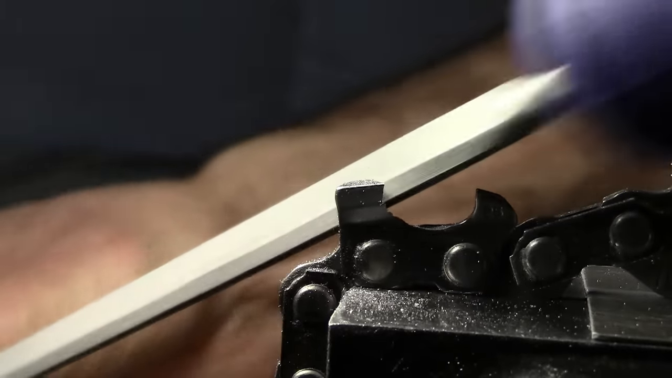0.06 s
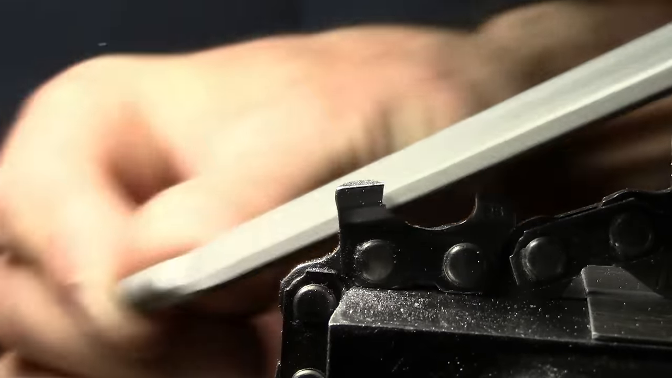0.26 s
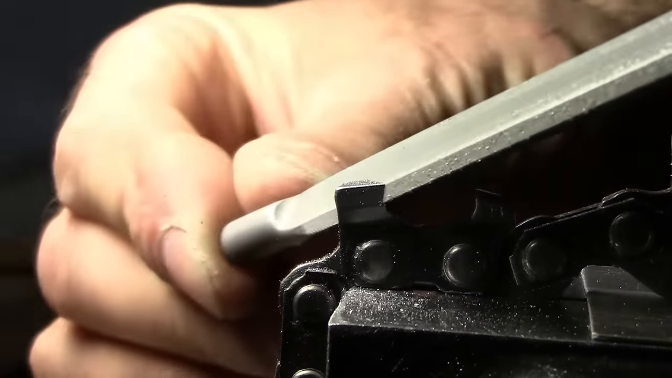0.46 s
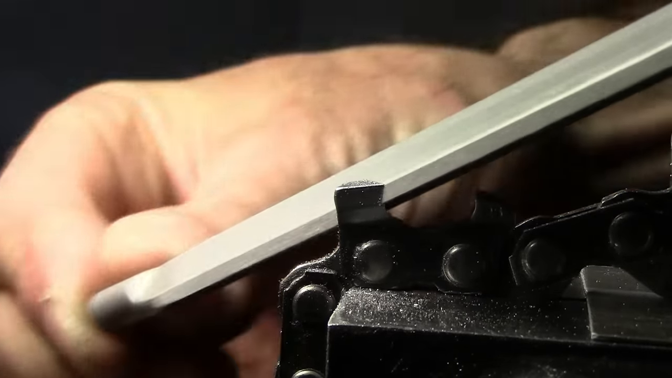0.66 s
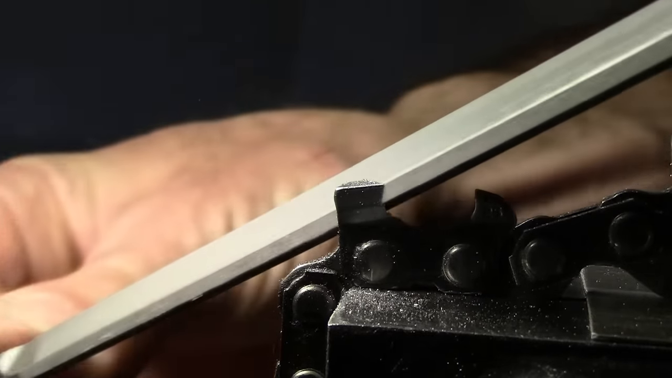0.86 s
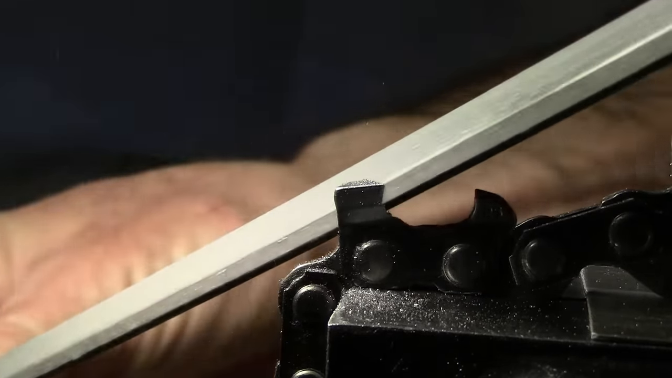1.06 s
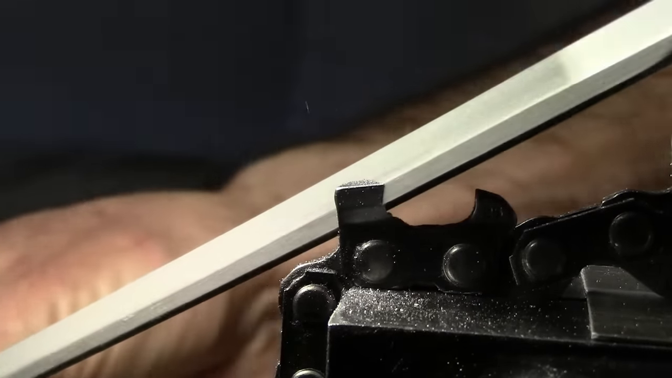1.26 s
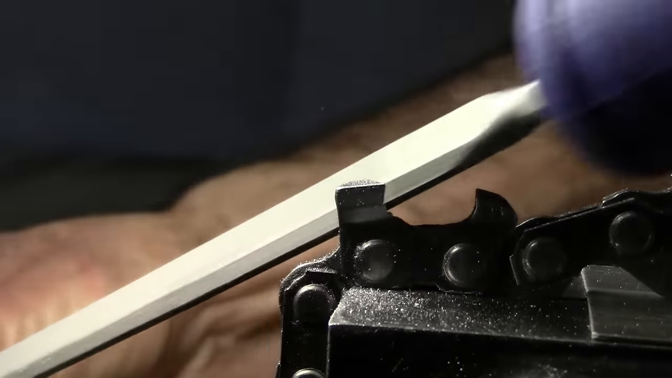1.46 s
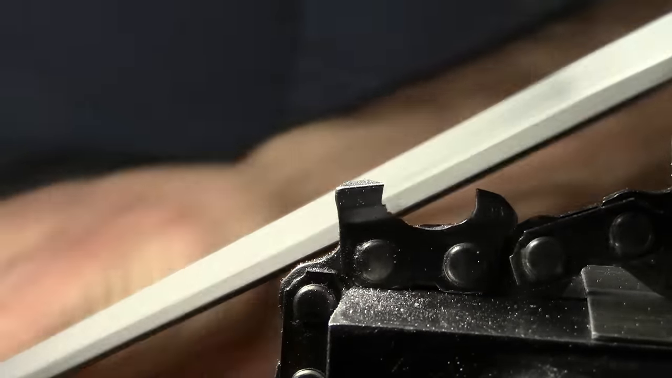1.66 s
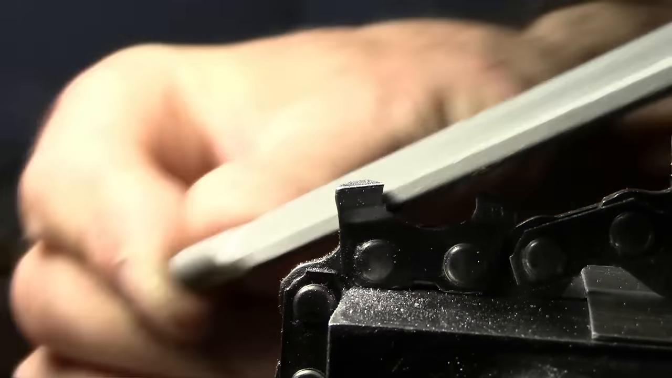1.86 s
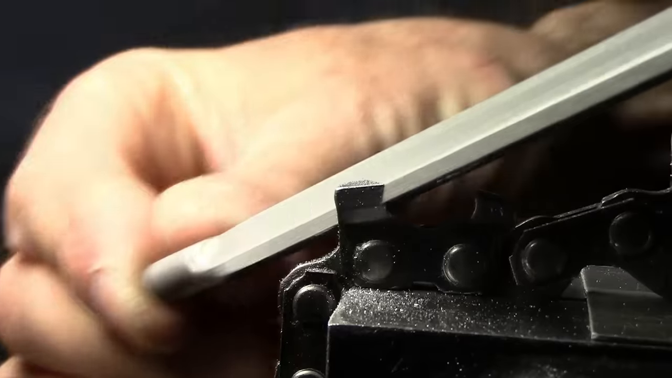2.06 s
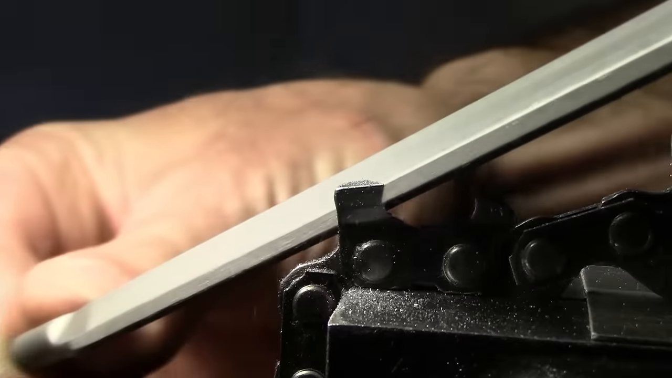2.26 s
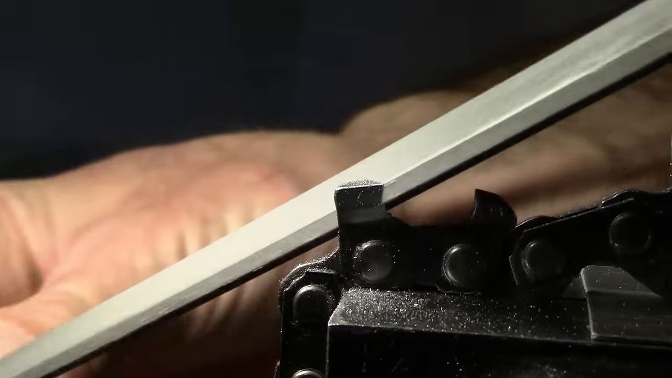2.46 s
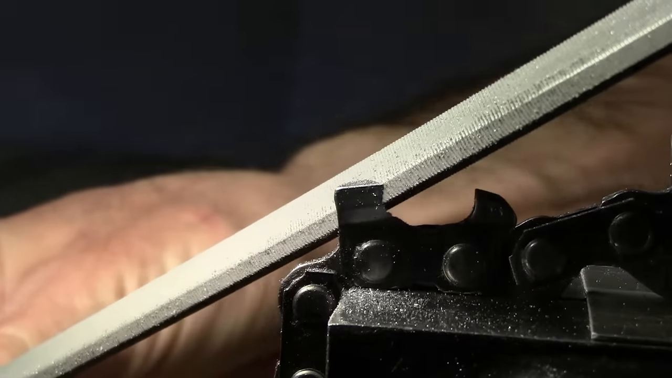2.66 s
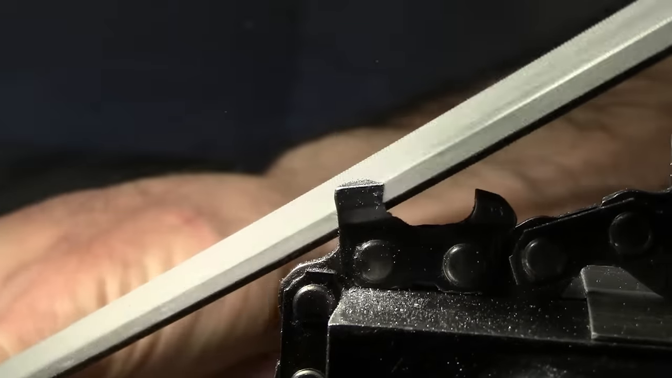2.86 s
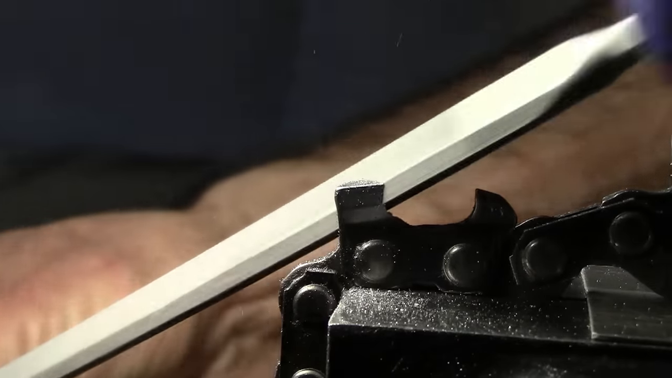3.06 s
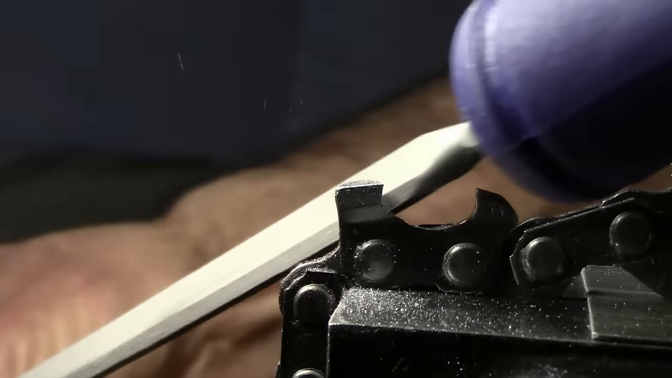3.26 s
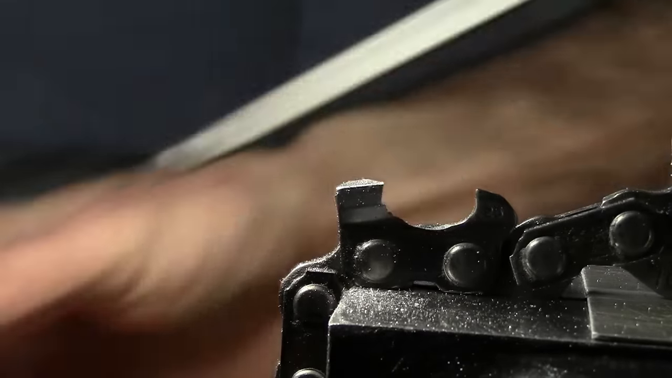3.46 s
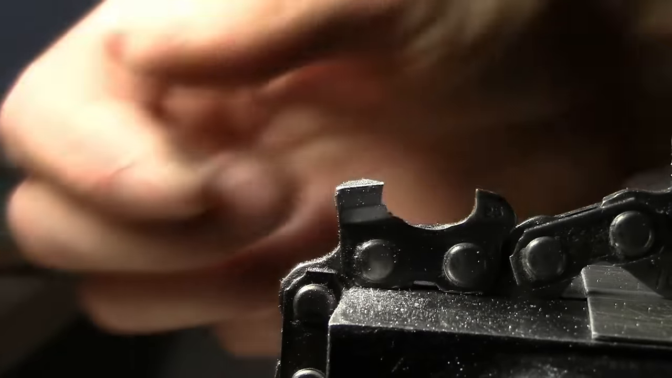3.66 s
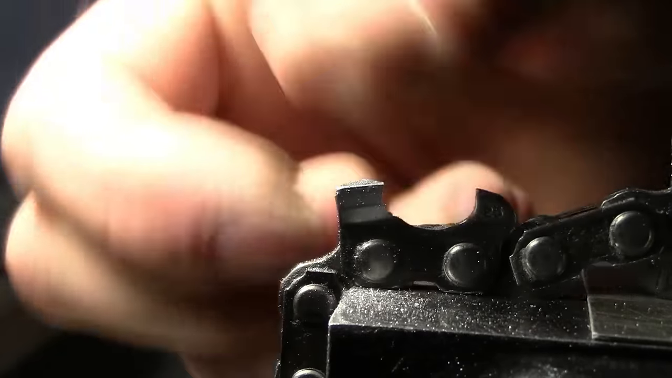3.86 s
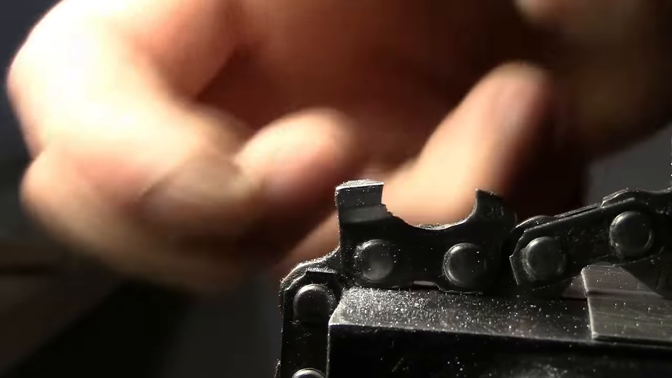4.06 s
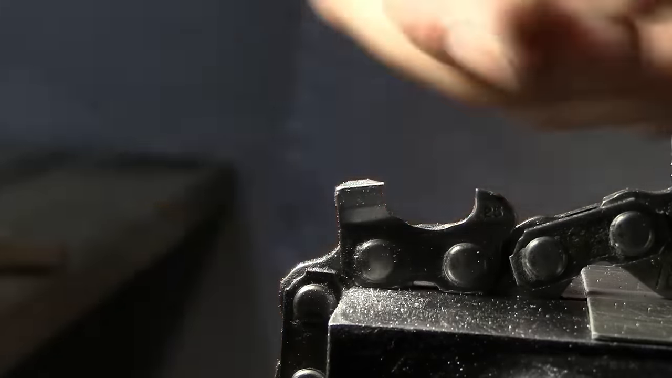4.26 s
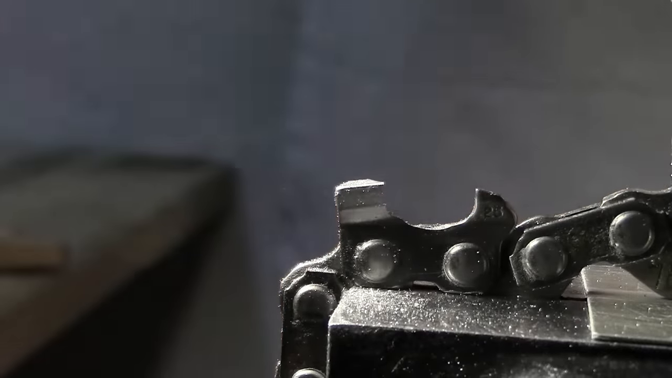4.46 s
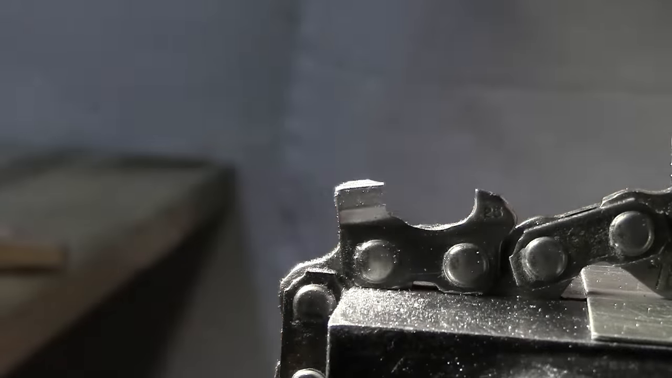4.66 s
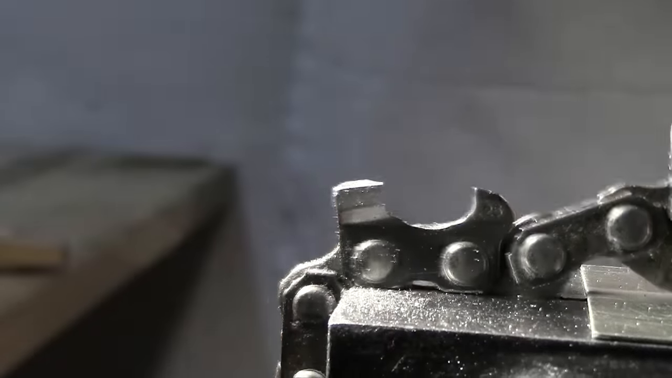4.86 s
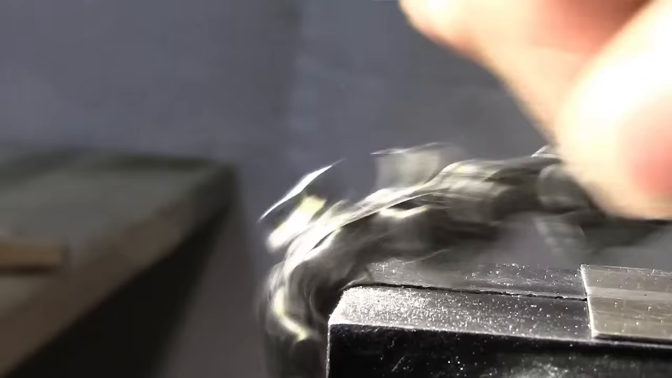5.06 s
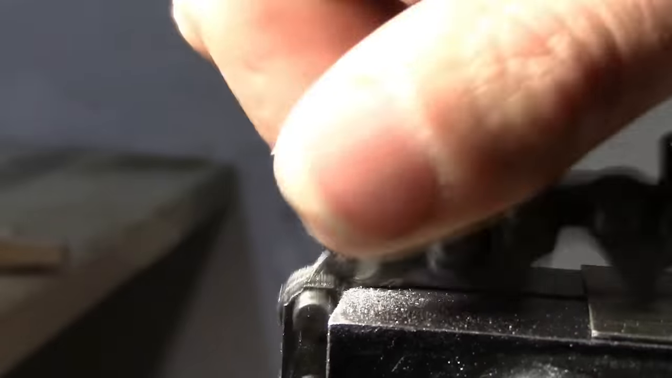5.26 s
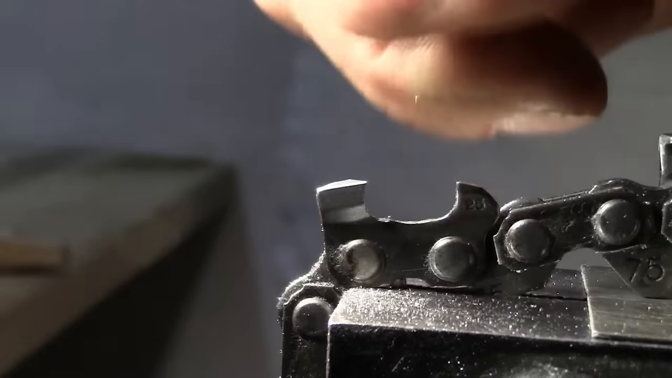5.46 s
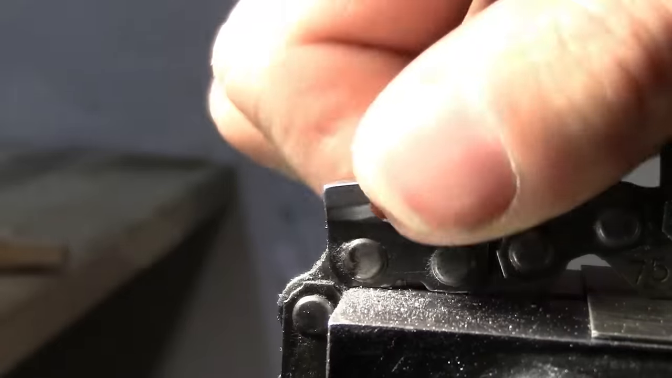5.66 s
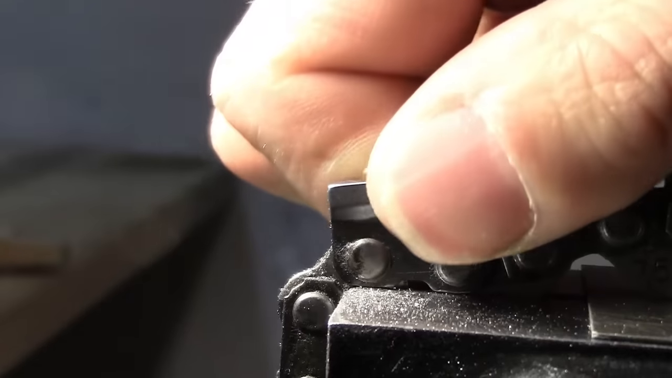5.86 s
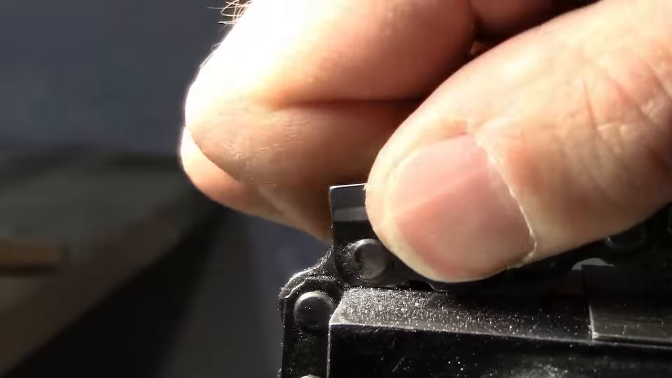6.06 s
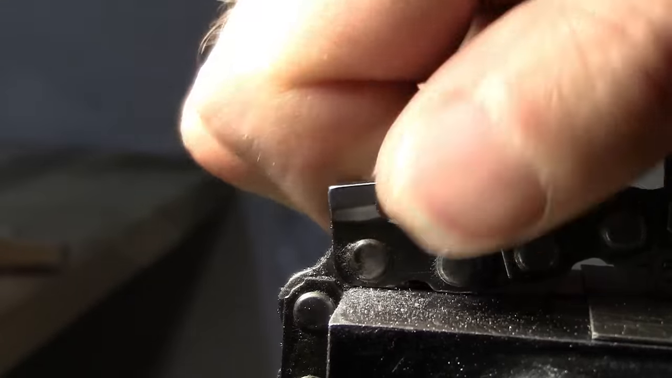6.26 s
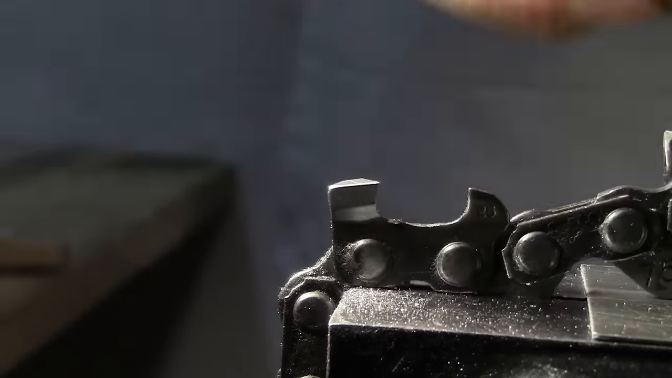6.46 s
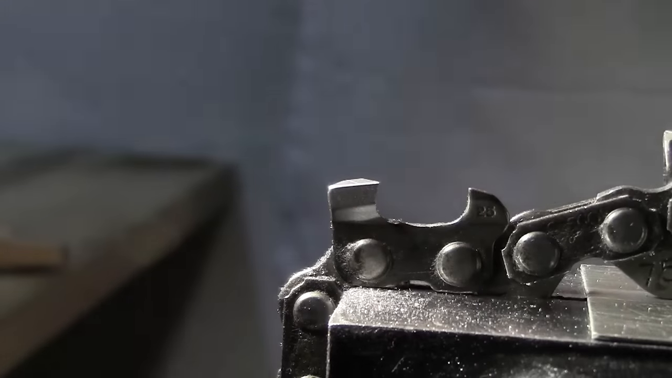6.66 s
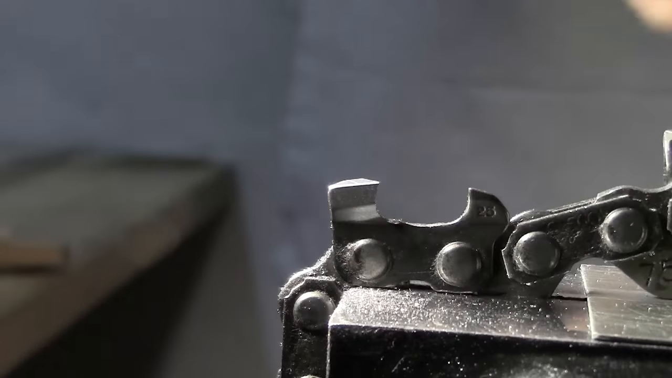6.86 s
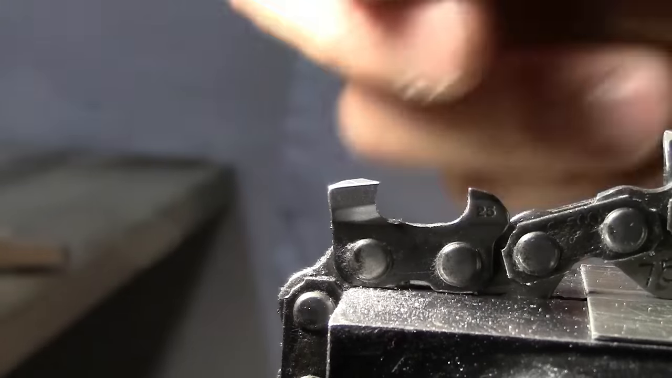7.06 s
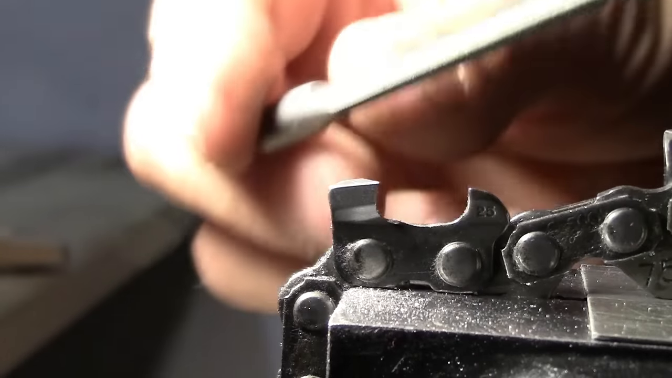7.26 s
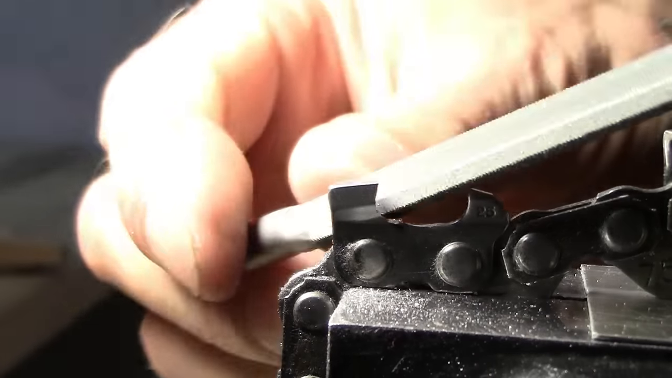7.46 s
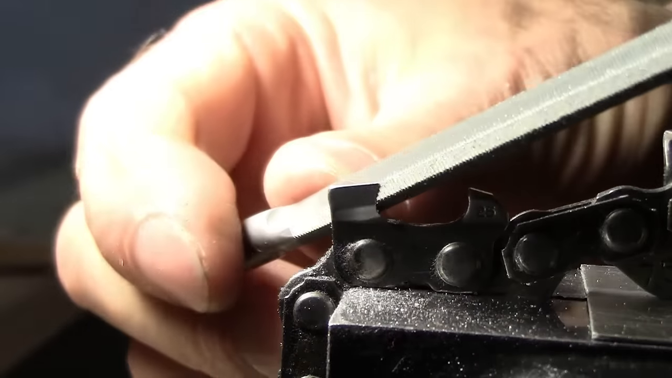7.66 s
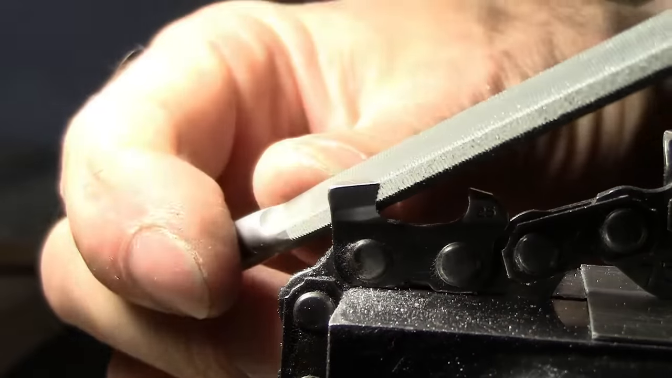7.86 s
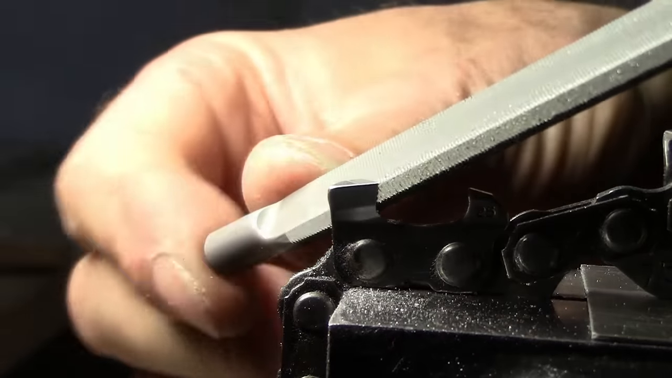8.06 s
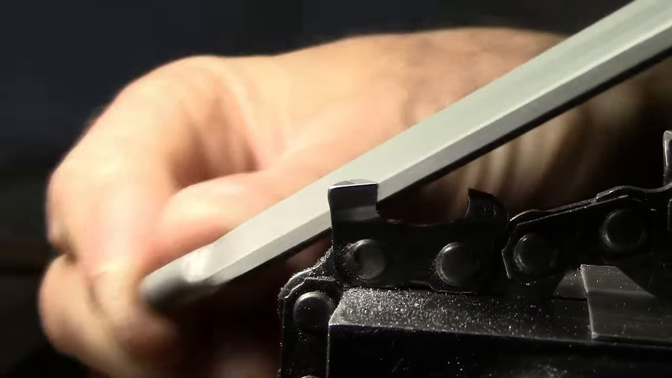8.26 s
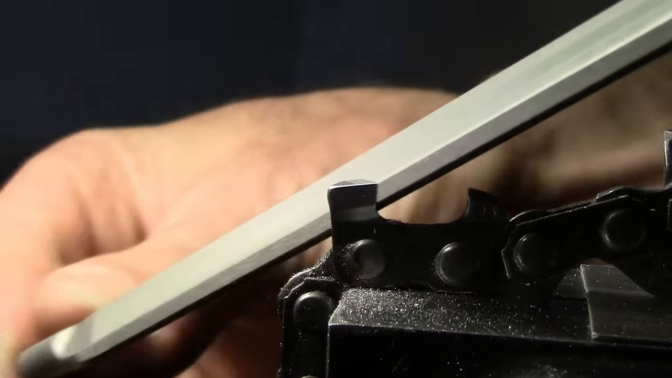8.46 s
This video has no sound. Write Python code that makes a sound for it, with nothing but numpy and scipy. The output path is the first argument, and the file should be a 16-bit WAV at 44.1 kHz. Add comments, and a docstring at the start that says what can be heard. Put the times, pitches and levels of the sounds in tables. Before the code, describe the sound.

Harsh bright scraping of a file on clamped steel, each stroke about a second long, its pitch rising with hand speed and the bench humming low beneath. Then a clanging drop, a low jolt, a quick rattling drag of chain, a squeaky turn of the vice screw ending in a clunk, a quiet pause, light ticks and a fresh rasp. Close microphone, short room reverberation, faint low air noise.

```python
"""Sharpening a saw chain in a vice

A hand file is pushed across a saw-chain cutter held in a bench vice. The file is set down ringing,
the vice is opened, the chain is dragged on link by link, the vice is screwed shut and filing starts again.
Friction is flickering noise and blows are scattered clicks; both excite resonances of steel and bench.
The dropped file is a sum of decaying modes. A small workshop reverberates around it, over steady air noise.
"""
import sys
import numpy as np
from scipy import signal
from scipy.fft import rfft, irfft
from scipy.io import wavfile

SR = 44100
rng = np.random.default_rng(int(sys.argv[2]) if len(sys.argv) > 2 else 0)


def to_wav(s):
    """Save 16-bit WAV."""
    ch = np.atleast_2d(s).T  # columns
    pcm = np.round(np.clip(ch, -1, 1) * 32767)  # PCM
    wavfile.write(sys.argv[1], SR, pcm.astype(np.int16))


N = 375732


def from_db(db):
    """Level: decibels become an amplitude ratio."""
    return 10 ** (np.asarray(db) / 20)


def unit(x):
    """Normalisation: the signal is scaled to energy 1."""
    return x / np.sqrt(np.sum(x ** 2) + 1e-20)


def filtered(x, order, hz, kind="low"):
    """Spectral shaping: a Butterworth filter passes one range of frequencies."""
    return signal.sosfilt(signal.butter(order, hz, kind, fs=SR, output="sos"), x)


def in_time(tables, before):
    """Control curves: columns interpolated at every sample; outside the tables they hold `before`."""
    out = np.tile(np.array(before, float)[:, None], N)
    for rows in tables:
        s, *columns = np.transpose(rows)
        at = np.arange(round(s[0] * SR), min(round(s[-1] * SR), N))
        out[:, at] = [np.interp(at / SR, s, c) for c in columns]
    return out


def drift(rate):
    """Slow random modulation: chance values of spread about 1, `rate` per second, joined by lines."""
    knots = rng.standard_normal(int(200 * N / SR) + 2)
    return np.interp(np.arange(N) * rate / SR, np.arange(len(knots)), knots) * np.sqrt(3 / 2)


def lagged(gain, lag_s):
    """Inertia: a heavy body follows a force slowly, as a first-order lag."""
    r = np.exp(-1 / (max(lag_s, .001) * SR))
    return signal.lfilter([1 - r], [1, -r], gain, zi=[r * gain[0]])[0]


def gliding(hz, half_width_hz):
    """Quadrature modulation: low-passed noise on a moving carrier is a gliding narrow band; rms 1."""
    slow = filtered(rng.standard_normal((2, N)), 2, half_width_hz)
    phase = 2 * np.pi * np.cumsum(hz) / SR
    return unit(slow[0] * np.cos(phase) + slow[1] * np.sin(phase)) * np.sqrt(N)


def response(peaks):
    """Modal superposition: impulse response of parallel resonances; white noise comes out at rms 1."""
    click, out = signal.unit_impulse(SR // 3), 0
    for k, (hz, width, db) in enumerate(sorted(peaks)):
        r = np.exp(-np.pi * width / SR)
        poles = [1, -2 * r * np.cos(2 * np.pi * hz / SR), r * r]
        mode = signal.lfilter([(1 - r * r) / 2, 0, -(1 - r * r) / 2], poles, click)
        out = out + (-1) ** k * from_db(db) * mode   # neighbouring modes have opposite signs
    return unit(out)


def through(force, peaks):
    """Linear response: a force sounds through a body by convolution."""
    return signal.oaconvolve(force, response(peaks))[:N]


def steel(middle, high, peaks, wander_db=0):
    """Modal coupling: lower and upper modes have a drive each; coupling varies as the contact moves."""
    split_hz, out = 3500, 0
    lower = [p for p in peaks if p[0] < split_hz]
    upper = [p for p in peaks if p[0] >= split_hz]

    def power(group):
        return sum(width * from_db(2 * db) for _, width, db in group)

    for drive, group in ((middle, lower), (high, upper)):
        for third in range(3):   # every third mode shares one wandering coupling
            part = group[third::3]
            share = np.sqrt(power(part) / power(group))
            out = out + share * through(drive * from_db(wander_db * drift(7.8)), part)
    return out


# Resonances of the bench top: (frequency [Hz], width [Hz], relative level [dB])
BENCH_MODES = [(125, 14, -13), (160, 18, -8), (190, 14, -5), (214, 11, 1), (240, 18, -6), (200, 200, -26)]


def bench(force):
    """Structure-borne sound: a force on the steel is passed on to the bench top."""
    return through(force, BENCH_MODES)


def grit(spread_db, flutter_db):
    """Asperity contact: dense micro-impacts of uneven size whose strength flutters; rms 1."""
    sizes_db = spread_db * np.minimum(rng.exponential(1, N), 5)
    sizes = from_db(sizes_db + flutter_db * drift(45.0))
    return unit(sizes * rng.standard_normal(N)) * np.sqrt(N)


def rub(rasp_db, hiss_db, bench_db, bench_lag_s, peaks, spread_db, high_spread_db, flutter_db,
        wander_db, bites=0):
    """Friction excitation: rough contact drives the steel, and through it the slower bench."""
    force = grit(spread_db, flutter_db)
    bench_sound = bench(lagged(from_db(rasp_db + bench_db), bench_lag_s) * force)
    middle = from_db(rasp_db) * (force + bites)
    high = from_db(rasp_db + hiss_db) * grit(high_spread_db, flutter_db)
    return bench_sound + steel(middle, high, peaks, wander_db)


def skids(rows):
    """Transient contact: it closes fast, sags and lets go; gives rasp, hiss and bench levels."""
    contact_s, let_go_s, let_go_db = 0.0027, 0.065, 39.96
    curves = []
    for s, length, db, sag, *rest in rows:
        end_db = db - sag * length
        curves.append([(s, db - 7, *rest), (s + contact_s, db, *rest), (s + length, end_db, *rest),
                       (s + length + let_go_s, end_db - let_go_db, *rest)])
    return in_time(curves, before=[-120, 0, 0])


def blows(events, peaks, gain_db, top_gain_db, bench_db, scatter_s):
    """Impact excitation: each blow is a click that scatters into a short burst of smaller contacts."""
    top_hz = 8500
    drives, t = np.zeros((3, N)), np.arange(SR // 20) / SR
    chances = rng.standard_normal((len(events), len(t)))
    for (s, peak_db, middle_db, top_db), chance in zip(events, chances):
        burst = from_db(peak_db + gain_db) * chance * np.exp(-t / scatter_s)
        at = round(s * SR)
        gains = from_db([middle_db, 0, top_db + top_gain_db])
        drives[:, at:at + len(t)] += gains[:, None] * burst
    middle, high, top = drives
    upper = filtered(high, 4, top_hz) + filtered(top, 4, top_hz, "high")
    return steel(middle, upper, peaks) + from_db(bench_db) * bench(middle)


# File pushed across the cutter, one list a stroke:
# (time [s], pressure as rasp level [dB], tooth rate [1/s])
STROKES = [
    [(0, -29.5, 900), (.094, -33.5, 700), (.17, -64, 500)],
    [(.6, -50, 450), (.675, -29.5, 640), (.8, -30, 960), (1.08, -28.5, 1390), (1.2, -32.5, 1500),
     (1.42, -32, 1100), (1.62, -37, 750), (1.71, -64, 600)],
    [(2.11, -49.5, 700), (2.18, -29.5, 830), (2.25, -30.5, 990), (2.45, -32.5, 1160), (2.66, -32.5, 1420),
     (2.78, -33.5, 1700), (2.84, -84, 1500)],
    [(2.92, -58.5, 1300), (2.96, -35.5, 1357), (3.0, -29, 1450), (3.1, -27.5, 1450), (3.24, -32.5, 1100),
     (3.3, -36, 900), (3.33, -54.5, 800)],
    [(8.31, -66, 500), (8.33, -42.5, 540), (8.38, -31, 740), (8.52, -32.5, 1170)],
]
# Each pass along the file begins: (time [s], teeth already passed [count])
PASSES = [(0, 1050), (.6, 0), (2.11, 0), (8.31, 0)]
# Along the file, levels relative to the rasp before fixed trims: (teeth passed [count],
# regular bites [dB], upper mode [Hz], upper mode [dB], lower modes [dB], bench [dB], hiss [dB])
ALONG_FILE = [(0, -25, 3100, -25, -0.5, 8.5, -5), (79.3, -9.5, 3200, -29, -15.5, 0, -6.5),
              (254, -9.5, 4600, -11.5, -7.5, 0.5, -2.5), (470, -5.5, 4780, 4, -7.5, 2.5, -4.5),
              (608, -7.5, 4700, 0.5, -3, -0.5, -6.5), (768, -18.5, 4500, -5.5, -8.5, 6.5, -5),
              (950, -22, 4400, -8.5, -2, 1.5, -5), (1148, -19, 4400, -7, -10, 0, -5.5)]


def stroking():
    """Kinematics: the summed tooth rate gives the place on the file, which sets the contact."""
    rasp_db, per_s = in_time(STROKES, before=[-120, 0])
    passed = np.cumsum(per_s) / SR
    starts, already = np.transpose(PASSES)
    at = (starts * SR).astype(int)
    current = np.searchsorted(at, np.arange(N), "right") - 1
    passed = passed + (already - passed[at])[current]
    place, *columns = np.transpose(ALONG_FILE)
    return rasp_db, per_s, *(np.interp(passed, place, c) for c in columns)


# Resonances of the file pressed on the cutter: (frequency [Hz], width [Hz], relative level [dB])
CLAMPED_MODES = [(354.5, 30, 2.5), (452, 68, -3), (680, 13, -5.5), (908, 20, -8.5), (949, 20, -4.5),
                 (1116, 9.7, -4), (1240, 6.3, 1.5), (1398, 36, -4.5), (1796, 62, -2), (2017, 59, -9),
                 (2890, 97, -12), (2657, 406, -6.5), (3257, 34, -2), (4050, 120, 5.5), (4290, 280, -0.5),
                 (6430, 310, 9), (6800, 310, 3), (7469, 260, 1), (7840, 97, -2.5), (9420, 170, -10),
                 (10040, 1200, -4), (11300, 300, 2), (740, 2960, -15.5), (2340, 1830, -14),
                 (4600, 1600, -27), (7468, 11000, -6), (12500, 4400, -10)]


def filing(rasp_db, per_s, bite_db, bench_db, hiss_db):
    """Forced vibration: rasp and tooth bites drive the file pressed on the cutter."""
    return rub(rasp_db, hiss_db, bench_db, .04, CLAMPED_MODES, spread_db=2.2, high_spread_db=2.2,
               flutter_db=1.2, wander_db=3.3, bites=teeth(per_s, bite_db))


def teeth(per_s, share_db):
    """Periodic excitation: hand speed sets the tooth rate; uneven bites make the tone a rough band."""
    return from_db(share_db + 3 * drift(22.0)) * gliding(per_s, half_width_hz=100)


def singing(rasp_db, hz, upper_db, lower_db):
    """Sustained resonance: the rasp keeps a gliding upper mode and a close pair of low modes sounding."""
    pair = [(538, 34, 0.62), (599, 46, -1.6)]   # (Hz, width Hz, dB)
    lower = through(from_db(rasp_db + lower_db) * rng.standard_normal(N), pair)
    return from_db(rasp_db + upper_db - 3) * gliding(hz, half_width_hz=250) + lower


# File skittering onto or off the cutter: (time [s], length [s], rasp level [dB], sag [dB/s],
# hiss re rasp [dB], bench re rasp [dB])
LANDINGS = [(.428, 0.11, -20, 137, -6.5, -13), (1.954, 0.074, -21.5, 40, -4.5, -14.5),
            (3.368, 0.012, -33.5, 50, -11.5, -12), (7.594, 0.086, -34, 29.8, -11, -11)]
# Resonances of the file resting loosely: (frequency [Hz], width [Hz], relative level [dB])
LOOSE_MODES = [(552, 110, -4.5), (1368, 38, 7.5), (1790, 15, 2), (2140, 150, 2.5), (2650, 125, 7),
               (4010, 100, -13.5), (6470, 120, -7.5), (7525, 59, -4), (10450, 72, -12), (12540, 57, -29),
               (13590, 70, -19.5), (1000, 580, -6), (2480, 1120, -5.5), (5850, 2000, -14),
               (8050, 1700, -22), (12500, 4000, -54)]


def landings():
    """Light contact: skittering excites the modes of the loosely resting file."""
    return rub(*skids(LANDINGS), .08, LOOSE_MODES, spread_db=3.0, high_spread_db=6.5,
               flutter_db=1.1, wander_db=1.1)


# Chain links sliding over the jaws:
# (time [s], rasp level [dB], hiss re rasp [dB], bench re rasp [dB])
DRAG = [(4.84, -62.5, -17, 7.5), (4.895, -30.5, -14.5, -1), (4.945, -27, -36.5, 1.5),
        (4.985, -34, -15, 1.5), (5.0, -25.5, -13.5, -14.5), (5.08, -29, -4.5, -11.5),
        (5.2, -27.5, -0.5, -13.5), (5.33, -30, 1.5, -7), (5.4, -35, 4.5, -6.5), (5.45, -47, 6.5, 5.5),
        (5.6, -53.5, -5.5, 2)]
# Resonances of the loose chain: (frequency [Hz], width [Hz], relative level [dB])
CHAIN_MODES = [(520, 126, -8.5), (660, 150, -6), (967, 18, -1), (1397, 79, 0.5), (1890, 490, -4),
               (2783, 72, -0.5), (6160, 250, -20), (8640, 170, -15.5), (9500, 170, -7), (10450, 170, -7),
               (930, 1110, -7.5), (2450, 2300, -8.5), (5400, 4200, 2), (8500, 2500, -18),
               (12330, 2600, -27)]


def chain_drag():
    """Friction excitation: links sliding over the jaws sound in the modes of the loose chain."""
    return rub(*in_time([DRAG], before=[-120, 0, 0]), .02, CHAIN_MODES, spread_db=3.2,
               high_spread_db=4.5, flutter_db=1.6, wander_db=1.5)


# Links snapping over the edge, before fixed gains:
# (time [s], peak level [dB], middle re peak [dB], top re peak [dB])
SNAPS = [(4.802, -9.5, -4.5, -54.5), (4.8639, -39, -12, -11), (4.9915, -11, 16.5, -26),
         (5.09, -8, -33.5, -24.5), (5.1118, -3.5, -27.5, -6.5), (5.1682, -7, -22.5, -10),
         (5.1868, -7.5, -13, -5), (5.2073, -8, -26, -10.5), (5.2403, -11.5, -1.5, -21.5),
         (5.2485, -6, 2, -15.5), (5.2662, -9, 2.5, -4.5), (5.2863, -2, -6, -28),
         (5.3398, -0.5, -16.5, -14.5), (5.3758, -9, -25, -10.5), (5.3924, -18, 7.5, -17),
         (5.4006, -11.5, -10.5, -18.5), (5.4126, 2, -68, -23.5)]


def chain_snaps():
    """Impact excitation: links snapping over the edge strike the chain."""
    return blows(SNAPS, CHAIN_MODES, gain_db=-6.0, top_gain_db=16, bench_db=-21.5, scatter_s=.002)


# A freed link rattling after its snap: (time [s], drive level [dB])
RATTLES = [(5.1115, -13), (5.1875, -14), (5.2657, -12), (5.2865, -18), (5.378, -17)]
# Resonances of one freed link: (frequency [Hz], width [Hz], relative level [dB])
LINK_MODES = [(4900, 80, 0), (5070, 70, -4), (5240, 70, -4), (5660, 60, -1), (5790, 50, 0)]


def rattles():
    """Repeated impact: short dying chatter excites the modes of one link."""
    force, t = np.zeros(N), np.arange(SR // 20) / SR
    for (s, db), chance in zip(RATTLES, rng.standard_normal((len(RATTLES), len(t)))):
        force[round(s * SR):][:len(t)] += from_db(db) * chance * np.exp(-t / 0.014)
    return through(force, LINK_MODES)


# Fingers brushing the chain: (time [s], level [dB])
TOUCHES = [(4.378, -47), (5.752, -53.5)]


def touches():
    """Soft contact: skin on steel gives bright noise puffs with a smooth rise and fall."""
    t, spread_s = np.arange(N) / SR, 0.011
    level = sum(from_db(db) * np.exp(-.5 * ((t - s) / spread_s) ** 2) for s, db in TOUCHES)
    return through(level * rng.standard_normal(N), [(3000, 2500, 1), (7860, 9500, 0)])


# Vice screw turned shut: (time [s], rasp level [dB], hiss re rasp [dB], bench re rasp [dB])
TURN = [(5.87, -75, -2, -8), (5.9, -47.5, -14, -2), (5.97, -43.5, -3, -6), (6.06, -40.5, -6, -4),
        (6.14, -35, -6.5, 2), (6.16, -27, -12, -29), (6.21, -34.5, -6, -13), (6.28, -46, -25, 4)]
# Vice jaws jolting free, then tight: (time [s], length [s], rasp level [dB], sag [dB/s],
# hiss re rasp [dB], bench re rasp [dB])
JOLTS = [(4.64, .13, -27.5, 189.5, -29, 5.5), (6.35, 0.32, -27, 152, -41, 2.5)]
# Resonances of the vice screw: (frequency [Hz], width [Hz], relative level [dB])
SCREW_MODES = [(332, 21, -23.5), (500, 90, 0.5), (626, 540, -0.5), (1170, 94, 1.5), (1510, 62, 12.5),
               (1770, 200, 1.0), (2660, 32, 0.5), (877, 5.3, -10), (2070, 22, -10), (2280, 76, -5.5),
               (3084, 44, -5.5), (5390, 960, -2), (6430, 370, 5), (8150, 190, -3), (896, 1800, -7),
               (2140, 500, -8), (6300, 3400, -20.5), (10900, 5000, -66)]


def vice():
    """Friction excitation: the turning screw and the jolting jaws sound in the modes of the screw."""
    turn = rub(*in_time([TURN], before=[-120, 0, 0]), 0.015, SCREW_MODES, spread_db=1.0,
               high_spread_db=5.5, flutter_db=1.0, wander_db=2.5)
    jolts = rub(*skids(JOLTS), .008, SCREW_MODES, spread_db=2.0, high_spread_db=3.5,
                flutter_db=.8, wander_db=1.0)
    return turn + jolts


# Small knocks of steel on steel, before fixed gains:
# (time [s], peak level [dB], middle re peak [dB], top re peak [dB])
KNOCKS = [(0.436, 1, -35, -29), (5.756, -32, 7.5, -23), (6.109, -8, -4, -34), (6.153, -19, -16, -22),
          (6.219, -26.5, 17, -25), (4.65, -25.5, 22.5, -34), (6.352, -29.5, 23.5, -34),
          (7.358, -38, 19, -29), (7.596, -8, 7, -33), (7.689, -16, 8.5, 6), (8.157, -39.5, 0, 13.5)]


def knocks():
    """Impact excitation: small knocks of steel on steel sound in the modes of the loose file."""
    return blows(KNOCKS, LOOSE_MODES, gain_db=-13.0, top_gain_db=5.5, bench_db=-15.5, scatter_s=0.0011)


# File dropped on the bench, blow and bounce: (time [s], relative level [dB])
DROP = [(3.838, 4.5), (3.852, -22.5)]
# Bending modes of the free file: (frequency [Hz], relative level [dB], t60 before it settles [s])
FILE_MODES = [(5076, -24, .25), (5760, -18, .55), (6412, -22, .3), (7648, -4, .6), (9825, -3, .22),
              (11550, -24, .4), (12261, -16, .26), (13570, -24, .17), (14840, -26, .19)]


def dropped_file():
    """Free vibration: after a crack and a bench thud the bar's bending modes ring and beat until it settles."""
    out, thud, t = np.zeros(N), np.zeros(N), np.arange(SR) / SR
    ring = 0
    for hz, db, t60 in FILE_MODES:
        beat = 1 - 0.17 * np.cos(2 * np.pi * hz * t / 600)
        ring = ring + from_db(db - 60 * t / t60) * np.sin(2 * np.pi * hz * t) * beat
    # settling adds 70 dB/s of decay from 0.27 s
    ring = ring * from_db(-70 * np.clip(t - .27, 0, 1)) * (1 - np.exp(-t / 0.019))
    bursts = rng.standard_normal((len(DROP), SR)) * (np.exp(-t / .0014) + .1 * np.exp(-t / .045))
    cracks = filtered(bursts, 2, [2000, 8500], "band")
    thud_shape = np.exp(-t / 0.064) * (1 - np.exp(-t / 0.0041))
    for (s, db), crack in zip(DROP, cracks):
        at = round(s * SR)
        out[at:at + SR] += from_db(db) * (from_db(-14) * ring + from_db(-1.5) * crack)
        thud[at:at + SR] += from_db(db) * rng.standard_normal(SR) * thud_shape
    knock = through(thud, [(512, 42, -0.5), (730, 170, -9), (1300, 1600, -11)])
    return out + from_db(-43.5) * bench(thud) + from_db(-38) * knock


# Shoves that rock the bench: (time [s], peak level [dB])
SHOVES = [(3.92, -41), (4.72, -40), (5.03, -40), (5.299, -45.5), (5.5, -51.5), (6.26, -41), (6.42, -44),
          (7.76, -60), (8.42, -40.5)]
# Resonances of the bench legs: (frequency [Hz], width [Hz], relative level [dB])
LEG_MODES = [(30.24, 16, -6.5), (77.3, 12, 3)]


def sway(rasp_db):
    """Fundamental resonance: the bench rings at its lowest modes, rocked by the strokes and by shoves."""
    rise_db_per_s, fall_db_per_s = 150, 55.5
    t = np.arange(N) / SR
    level = from_db(-8.5) * lagged(from_db(rasp_db), lag_s=.09)
    for s, db in SHOVES:
        level = level + from_db(db - np.maximum(rise_db_per_s * (s - t), fall_db_per_s * (t - s)))
    force = through(rng.standard_normal(N), LEG_MODES)   # filtered twice for sharper peaks
    return level * unit(through(force, LEG_MODES)) * np.sqrt(N)


# Reverberation, and in the last two rows scattering around the microphone: (low edge [Hz],
# high edge, limited to 0.45 SR in the filter [Hz], t60 [s], relative level [dB], side/mid ratio [1])
ROOM = [(40, 600, 0.66, -3, 0.1), (322, 1070, 0.5, -1, 0.14), (1200, 3640, 0.55, -8, 0.1),
        (4030, 11000, 0.38, -13.5, 0.2), (9000, 19000, 0.23, -28, .8), (3500, 45000, 0.035, -15, 0.3),
        (11300, 25000, 0.017, -21, 4.0)]


def workshop(x):
    """Reverberation: dense reflections are noise decaying exponentially, band by band, in stereo."""
    t, tail = np.arange(SR) / SR, 0
    noises = rng.standard_normal((len(ROOM), 2, SR))
    for (low_hz, high_hz, t60, db, width), noise in zip(ROOM, noises):
        band = filtered(noise, 2, [low_hz, min(high_hz, .45 * SR)], "band")
        decay = from_db(-60 * t / t60) * np.clip(t / t60 / 0.0035, 0, 1)
        mid, side = unit(band * decay)
        gain = from_db(db) * np.sqrt(4 * (high_hz - low_hz) / SR)
        tail = tail + gain * (mid + width * side * [[1], [-1]])
    return signal.oaconvolve(x[None], tail, axes=1)[:, :N]


# Spectrum of the steady noise: (frequency [Hz], relative level [dB])
AIR_SPECTRUM = [(12, -22.5), (20, 6.5), (49, -7.5), (135, -4), (281, -5.5), (416, -10.5), (750, -14.5),
                (1240, -17.5), (1470, -17.5), (1840, -20.5), (6350, -28.5), (15200, -33), (16500, -43.5)]
# Likeness of left and right, negative values counting as 0: (frequency [Hz], correlation [1])
AIR_LIKENESS = [(60, -0.14), (180, -0.31), (550, -0.09), (1650, 0.64), (4970, 0.48), (15000, -0.22)]


def air():
    """Partial coherence: steady noise mixed from mid and side parts by frequency."""
    log_hz = np.log(np.fft.rfftfreq(N, 1 / SR) + 1)

    def curve(rows):
        hz, values = np.transpose(rows)
        return np.interp(log_hz, np.log(hz), values)

    alike = np.clip(curve(AIR_LIKENESS), 0, 1)
    mid, side = rfft(rng.standard_normal((2, N))) * from_db(curve(AIR_SPECTRUM))
    both = irfft(np.sqrt(1 + alike) * mid + np.sqrt(1 - alike) * side * [[1], [-1]], N)
    return from_db(-48.5 + .9 * drift(3.0)) * unit(both) * np.sqrt(2 * N)


def scene():
    """Superposition: all sources add close to the microphone; the bench sounds more from the right."""
    rasp_db, per_s, bite_db, upper_hz, upper_db, lower_db, bench_db, hiss_db = stroking()
    near = filing(rasp_db, per_s, bite_db, bench_db, hiss_db)
    near = near + landings() + chain_drag() + vice()
    near = near + chain_snaps() + rattles() + touches() + knocks()
    drop = dropped_file()
    near = near + drop + singing(rasp_db, upper_hz, upper_db, lower_db) + sway(rasp_db)
    left_right = np.array([[-1], [1]])
    lows = filtered(near, 1, 900)
    direct = near + 0.1 * lows * left_right + .02 * near * left_right
    aside = (from_db(1.0 * left_right) - 1) * drop   # the file lands to the right
    return direct + aside + workshop(near) + air()


def low_pass(x):
    """Removes everything above the highest recorded frequency."""
    return signal.sosfilt(signal.butter(12, 16660, fs=SR, output="sos"), x)


def record(dry):
    """Band limiting: the microphone rolls off the top, peaks clip at full scale and the top is cut."""
    mic_cut_hz, top_cut_hz = 11700, 15900
    heard = np.clip(filtered(dry, 2, mic_cut_hz), -1, 1)
    mix = filtered(heard, 8, top_cut_hz)
    return low_pass(mix)


dry = scene()
out = record(dry)
to_wav(out)
```